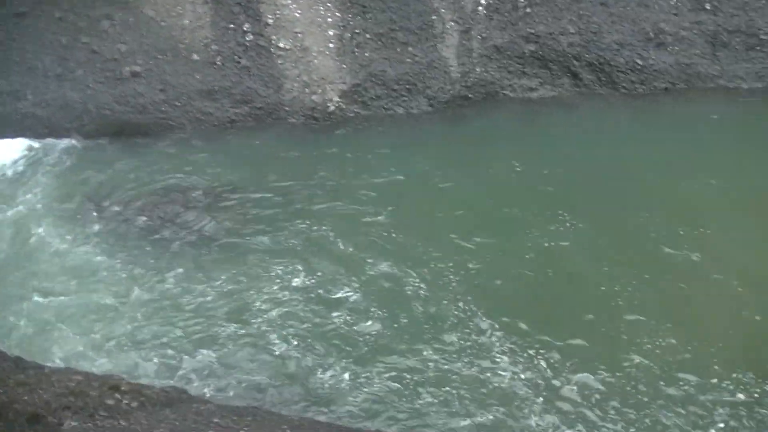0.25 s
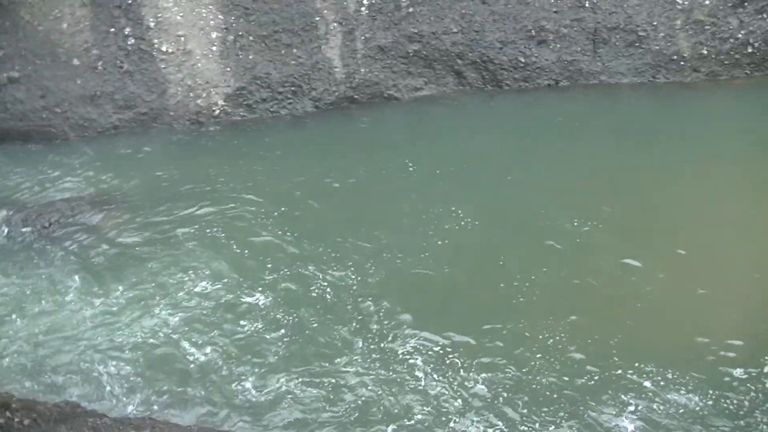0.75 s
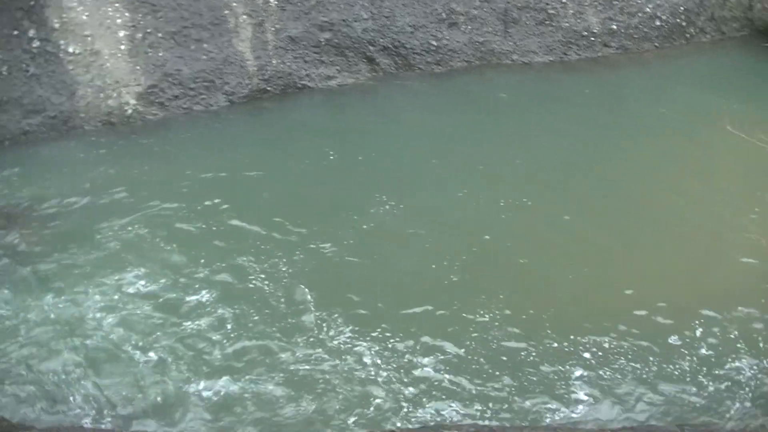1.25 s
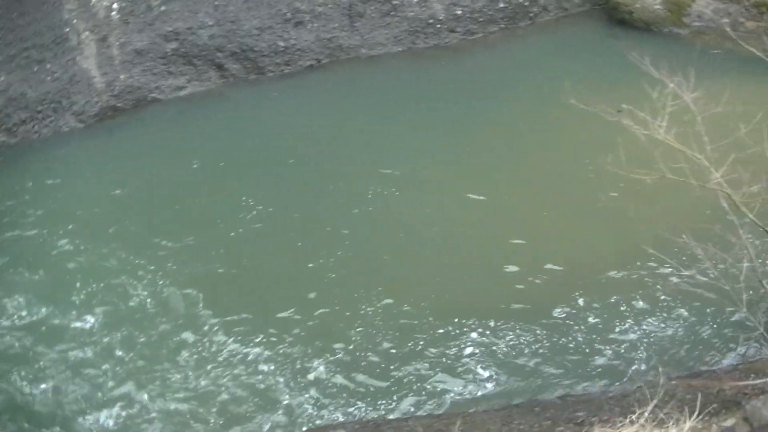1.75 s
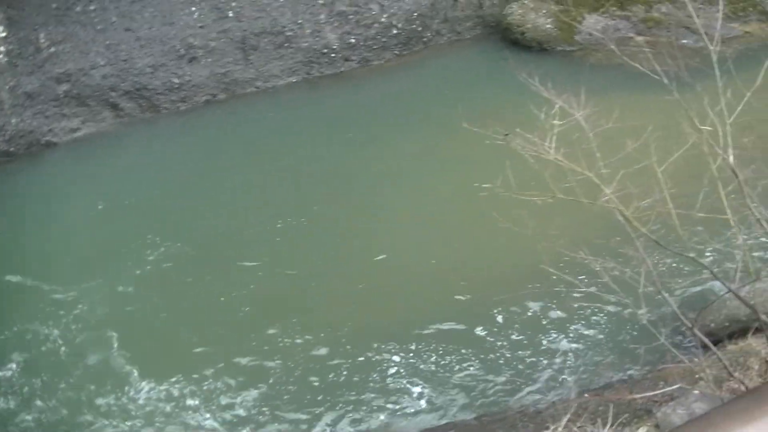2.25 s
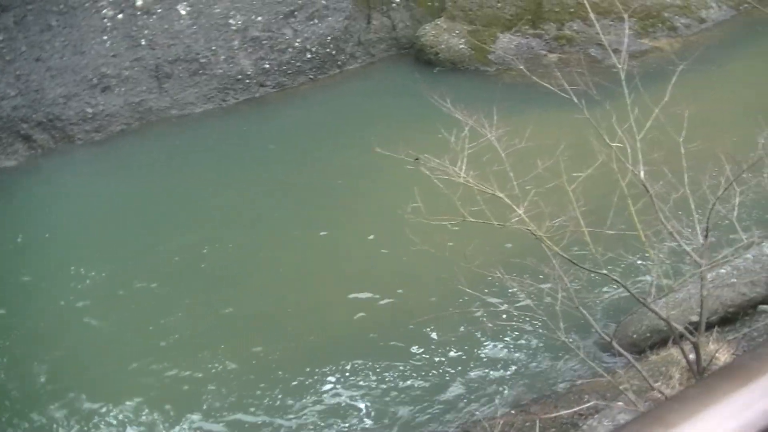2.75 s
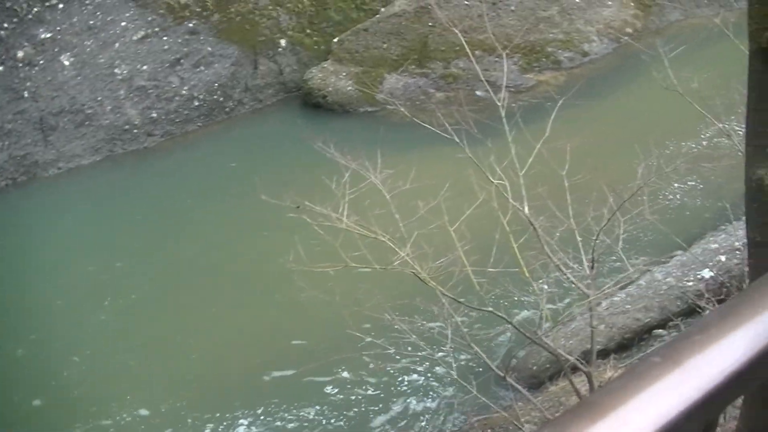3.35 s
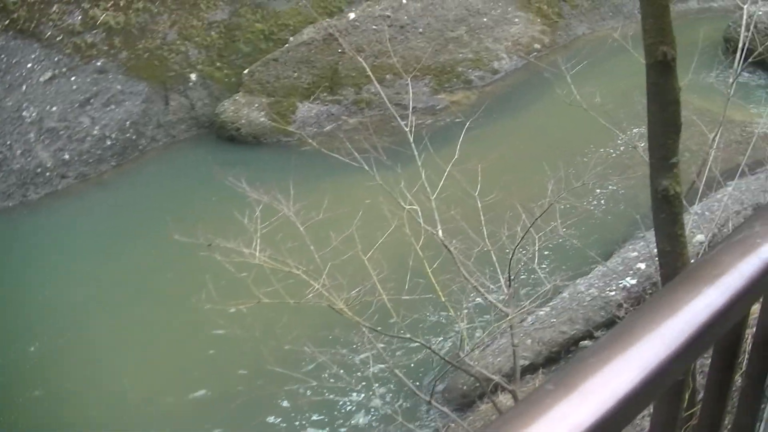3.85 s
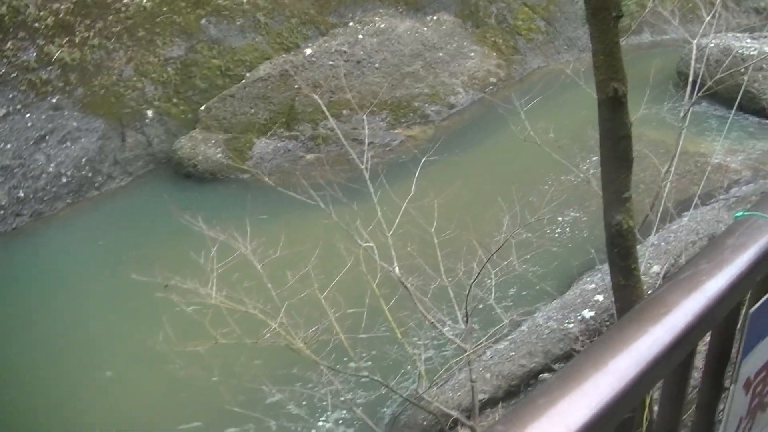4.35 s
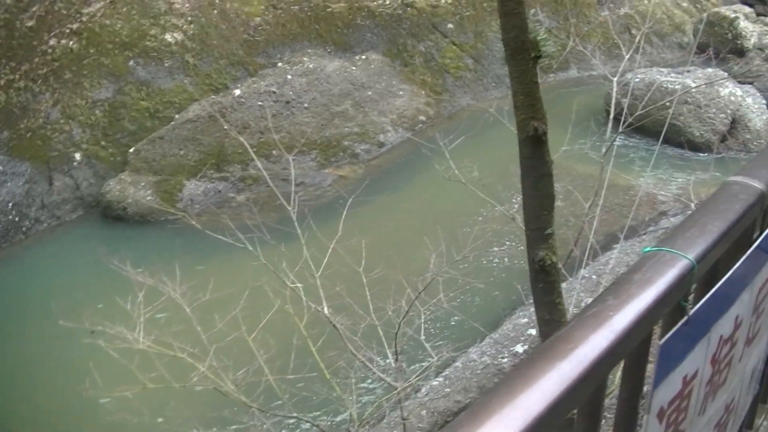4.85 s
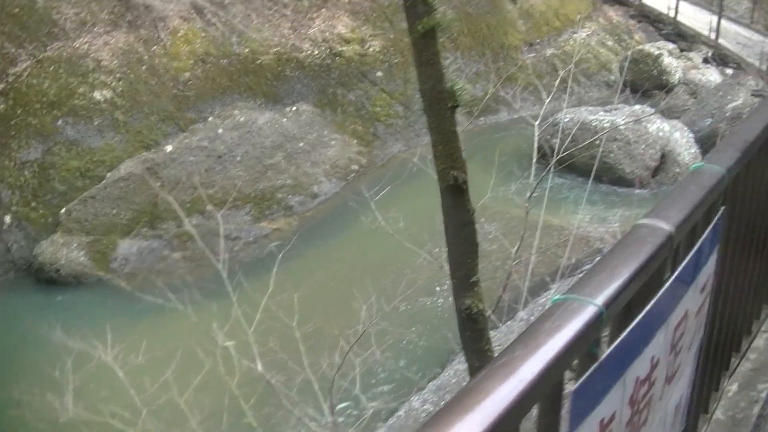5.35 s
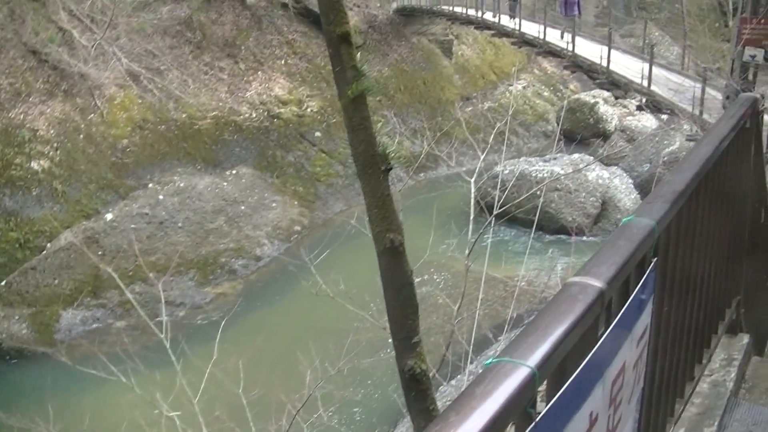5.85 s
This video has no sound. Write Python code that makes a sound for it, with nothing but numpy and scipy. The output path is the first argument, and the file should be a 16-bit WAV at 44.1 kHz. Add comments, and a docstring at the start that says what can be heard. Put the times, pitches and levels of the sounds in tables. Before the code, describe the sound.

Constant dense rushing water, bright and close to white noise, eases slightly and drifts a little left while a thin treble sheen slides upward.

```python
"""Waterfall in a rock gorge

A waterfall pours into a pool: resonating air pockets roar, while droplets and tiny bubbles merge into a hiss.
A hand-held camera pans away from the fall, so the hiss dulls and a thin sheen glides upward in the treble.
The gorge walls return a diffuse wash, made by partial decorrelation of the two ears.
The hand bumps the camera softly, each bump a single low pressure pulse."""
import sys
import numpy as np
from scipy import signal
from scipy.fft import rfft, irfft, next_fast_len
from scipy.io import wavfile
from scipy.ndimage import uniform_filter1d, map_coordinates

SR = 44100
rng = np.random.default_rng(int(sys.argv[2]) if len(sys.argv) > 2 else 0)


def store_wav(level_fs):
    """Save 16-bit WAV to argv[1]."""
    pcm = np.round(np.clip(np.atleast_2d(level_fs), -1, 1) * 32767)
    wavfile.write(sys.argv[1], SR, pcm.T.astype(np.int16))


N = 269451


def amp(db):
    """Decibel law: level in dB to amplitude ratio."""
    return 10 ** (np.asarray(db) / 20)


def unit(x):
    """Normalisation: scale to an rms of 1."""
    return x / np.sqrt(np.mean(x ** 2) + 1e-20)


def along(points, hz):
    """Logarithmic pitch: interpolate (f/Hz, value) points on a log-frequency axis."""
    f, value = np.transpose(points)
    return np.interp(np.log(hz + 1), np.log(f + 1), value)


def bell(x, centre, width):
    """Gaussian weighting: height 1 at the centre, 1/e at one width from it."""
    return np.exp(-((x - centre) / width) ** 2)


def wobble(rate):
    """Slow random modulation: a smooth curve through `rate` random knots a second."""
    knots = rng.standard_normal(int(N * rate / SR) + 4)
    return map_coordinates(knots, [np.arange(N) * rate / SR])


def filtered(x, response):
    """Linear time-invariant filtering: multiply the spectrum by response(f/Hz)."""
    padded = next_fast_len(N + SR // 2)
    spectrum = rfft(x, padded) * response(np.fft.rfftfreq(padded, 1 / SR))
    return irfft(spectrum, padded)[..., :N]


def shaded(x, gain, size=512):
    """Time-varying filtering: multiply the short-time spectrum by gain(f/Hz, t/s)."""
    hz, t, spectrum = signal.stft(x, SR, nperseg=size)
    return signal.istft(spectrum * gain(hz[:, None], t), SR, nperseg=size)[1][..., :N]


# the pan: one steady sweep away from the fall
PAN_START_S, PAN_LENGTH_S = 1.03, 3.3


def turned(t):
    """Uniform rotation: share of the sweep done, 0 facing the fall, 1 turned away."""
    return np.clip((t - PAN_START_S) / PAN_LENGTH_S, 0, 1)


# soft bumps of the hand on the camera: t/s, level/dB (the pulse shape peaks 2 dB above this)
HAND_BUMPS = [(0.031, -52), (.33, -59), (5.395, -65), (5.52, -70)]


def handling(push_s=0.0008):
    """Impulsive excitation: each bump is one low push and rebound through the camera body."""
    out = np.zeros(N)
    for start_s, level_db in HAND_BUMPS:
        u = np.maximum(np.arange(N) / SR - start_s, 0) / push_s
        out += amp(level_db) * u * (2 - u) * np.exp(1 - u)
    return out


def bubbles(rate, low_hz, high_hz, cycles, spread_db, size=400):
    """Bubble resonance: a random swarm of damped sines, each decaying by 1/e in `cycles` periods."""
    when, pitch, chance = rng.random((int(rate * N / SR), 3)).T
    hz = low_hz * (high_hz / low_hz) ** pitch
    turns = hz[:, None] * np.arange(size) / SR
    # a few rings are much stronger; strength also rises with pitch
    strength = amp(-spread_db * np.log(np.maximum(chance, np.exp(-4)))) * hz
    rings = strength[:, None] * np.sin(2 * np.pi * turns) * np.exp(-turns / cycles)
    at = (when * N).astype(int)[:, None] + np.arange(size)
    return unit(np.bincount(at.ravel(), rings.ravel(), N)[:N])


# likeness of the two ears in the walls' diffuse wash: f/Hz, correlation (-1 to 1)
EAR_CORRELATION = [(60, -.1), (100, 0.13), (155, 0.81), (220, 0.96), (340, 0.98), (640, 0.95), (1400, 0.88),
                   (2000, 0.81), (2900, 0.91), (4700, 0.95), (5800, 0.88), (7000, .94), (8700, .78),
                   (12000, .95), (14500, 1)]


def churn(grains, grain_db, patchy_db):
    """Diffuse-field coherence: patchy turbulent noise and bubbles, partly decorrelated between the ears."""
    field = rng.standard_normal((257, N // 256 + 3))  # one value per short-time bin and frame
    field = uniform_filter1d(uniform_filter1d(field, 6, 0), 16, 1)
    patches = unit(field)
    rush = shaded(rng.standard_normal((2, N)), lambda hz, t: amp(patchy_db * patches[:, :len(t)]))
    rush[0] += amp(grain_db) * grains  # the bubbles lie in the middle

    def mid_side_gains(hz):
        angle = np.arccos(np.clip(along(EAR_CORRELATION, hz), -1, 1)) / 2
        return np.array([np.cos(angle), np.sin(angle)])

    mid, side = filtered(rush, mid_side_gains)
    return np.array([mid + side, mid - side])


# spectrum of the water plunging into the pool: f/Hz, relative level/dB
PLUNGE_SPECTRUM = [(25, -45), (55, -45), (100, -30.5), (135, -21), (165, -12), (215, -7.5), (290, -0.8),
                   (430, 0), (680, -1), (1200, 0.6), (1800, -0.5), (3000, -12), (6000, -50)]


def plunge():
    """Entrained-air resonance: large air pockets ring where the fall drives into the pool."""
    pockets = bubbles(rate=400, low_hz=282, high_hz=1482, cycles=4.8, spread_db=2.0, size=1600)
    water = churn(pockets, grain_db=-19, patchy_db=0.26)
    return unit(filtered(water, lambda hz: amp(along(PLUNGE_SPECTRUM, hz))))


# spectrum of the spray with the microphone facing it: f/Hz, relative level/dB
SPRAY_FACING = [(500, -43), (1300, -14), (2000, -5.5), (2500, -1.3), (3100, .3), (3700, -1), (5100, -0.2),
                (6200, -7.5), (7200, -7.5), (8000, -14.5), (8800, -23.5), (11200, -24), (13200, -30),
                (15600, -39)]
# the same with the microphone turned away: f/Hz, relative level/dB
SPRAY_AWAY = [(500, -52), (1300, -9), (2400, -2.5), (3100, 0), (4100, -3.5), (4950, -3), (5400, -7),
              (7100, -6), (8000, -12.5), (8800, -19.5), (10000, -28.5), (11900, -26.5), (13000, -30.5),
              (15600, -34.7)]
# the sheen, a narrow treble peak of the camera body: it glides up with the angle and flares at one angle
SHEEN_START_HZ, SHEEN_RISE_HZ, SHEEN_WIDTH_HZ = 10600, 6000, 1100
SHEEN_DB, SHEEN_FLARE_DB = 0.5, 6
FLARE_AT, FLARE_SPAN = 0.69, 0.17  # shares of the sweep
# a shallow hollow in the hiss while the camera is side-on to the fall
HOLLOW_HZ, HOLLOW_WIDTH_HZ, HOLLOW_DB = 6850, 630, 2.5
HOLLOW_AT, HOLLOW_SPAN = 0.38, 0.27  # shares of the sweep
# mid-sweep, a reflection off the camera body combs the treble into evenly spaced ridges
RIDGE_STEP_HZ, RIDGE_DB, RIDGE_FULL_HZ = 2350, 3, 11000
RIDGE_AT, RIDGE_SPAN = 0.48, 0.3  # shares of the sweep


def bearing(hz, t):
    """Directivity: the colour of the spray changes with angle, its overall gain held constant."""
    away = turned(t)
    facing_db = (1 - away) * along(SPRAY_FACING, hz)
    away_db = away * along(SPRAY_AWAY, hz)
    boost_db = SHEEN_DB + SHEEN_FLARE_DB * bell(away, FLARE_AT, FLARE_SPAN)
    sheen_db = boost_db * bell(hz, SHEEN_START_HZ + SHEEN_RISE_HZ * away, SHEEN_WIDTH_HZ)
    hollow_db = HOLLOW_DB * bell(away, HOLLOW_AT, HOLLOW_SPAN) * bell(hz, HOLLOW_HZ, HOLLOW_WIDTH_HZ)
    comb = (0.5 + np.cos(2 * np.pi * hz / RIDGE_STEP_HZ)) * np.minimum(hz / RIDGE_FULL_HZ, 1) ** 2
    ridge_db = RIDGE_DB * bell(away, RIDGE_AT, RIDGE_SPAN) * comb / comb.max()
    gain = amp(facing_db + away_db + sheen_db + ridge_db - hollow_db)
    return gain / np.linalg.norm(gain, axis=0)


def spray():
    """Random superposition: thousands of droplets and tiny bubbles merge into a faintly fluttering hiss."""
    droplets = bubbles(rate=4000, low_hz=1790, high_hz=12370, cycles=2.3, spread_db=2.5, size=150)
    water = churn(droplets, grain_db=-10.5, patchy_db=0.5)
    flutter_db = 0.13 * wobble(13)
    return unit(shaded(water, bearing)) * amp(flutter_db)


# left minus right once turned away: f/Hz, level/dB
EAR_LEAN = [(100, 0.5), (600, 1.5), (1400, 3.5), (2400, 4), (3400, 1.8), (6000, 0.5), (8400, -1), (9900, 3),
            (12000, 0)]
# phase by which the left port leads the right: f/Hz, phase/rad
EAR_LEAD = [(250, 0.019), (600, .1), (1450, 0.12), (2100, -.06), (2850, -0.25), (3600, 0)]
# levels facing the fall, and what each loses in the sweep
ROAR_DB, ROAR_LOSS_DB = -44, 0.88
HISS_DB, HISS_LOSS_DB = -35, 1.92
HISS_SHADED_AT = 0.45  # share of the sweep by which the camera body hides the direct spray


def scene():
    """Shadowing and diffraction: the fall fades a little and drifts left as the body shades the right port."""
    away = turned(np.arange(N) / SR)
    roar_db = ROAR_DB - ROAR_LOSS_DB * away
    hiss_db = HISS_DB - HISS_LOSS_DB * np.minimum(away / HISS_SHADED_AT, 1)
    fall = amp(roar_db) * plunge() + amp(hiss_db) * spray()

    def lean_gains(hz, t):
        lean_db = along(EAR_LEAN, hz) * np.interp(turned(t), [0, 1], [0.45, 1.0])
        return amp(np.array([lean_db, -lean_db]) / 2)

    ears = shaded(fall, lean_gains)
    # bending round the body shifts the phase between the ports
    ears = filtered(ears, lambda hz: np.exp(np.outer([1j, -1j], along(EAR_LEAD, hz)) / 2))
    return ears + handling()


TOP_HZ = 15730


def record(dry):
    """Band limitation: the camera keeps nothing above its top frequency."""
    return filtered(dry, lambda hz: hz < TOP_HZ)


dry = scene()
out = record(dry)
store_wav(out)
```